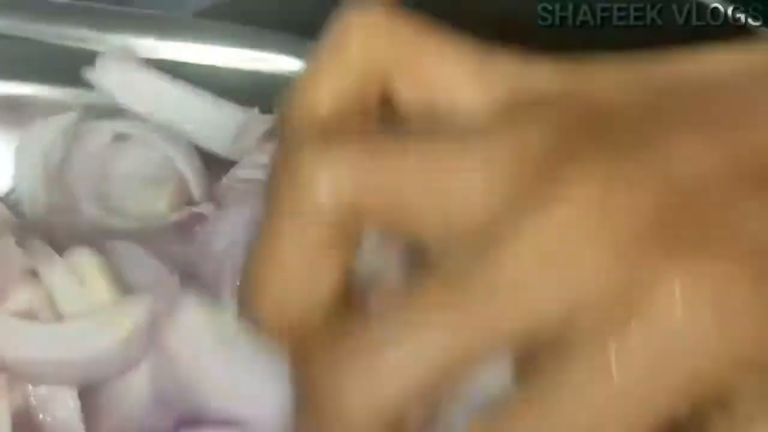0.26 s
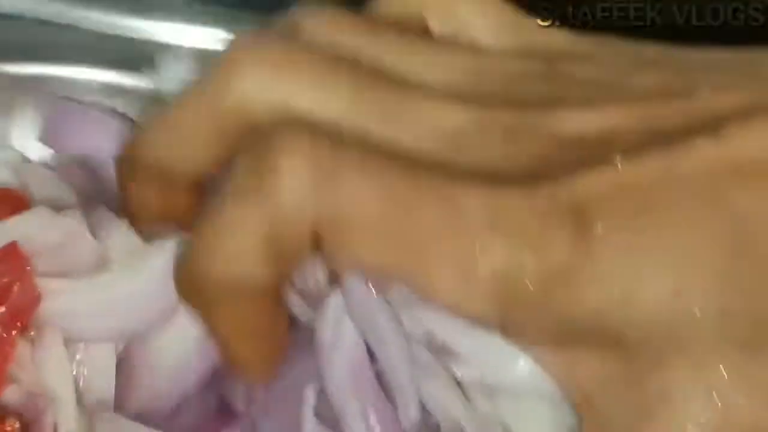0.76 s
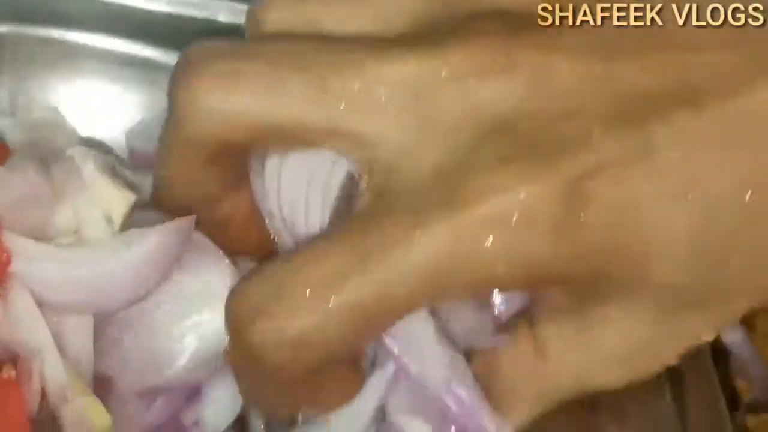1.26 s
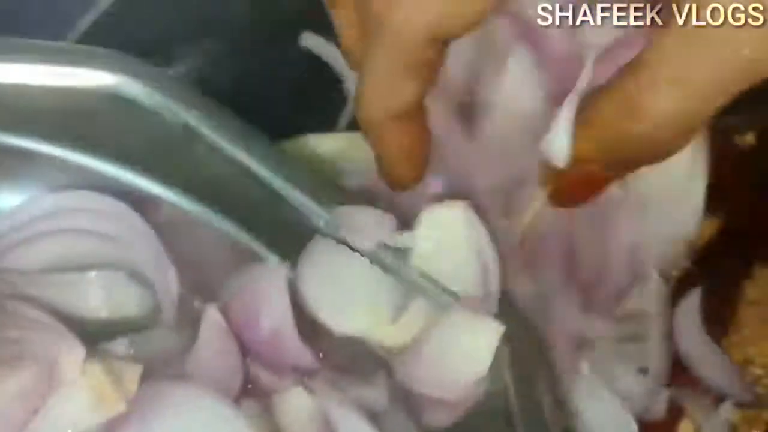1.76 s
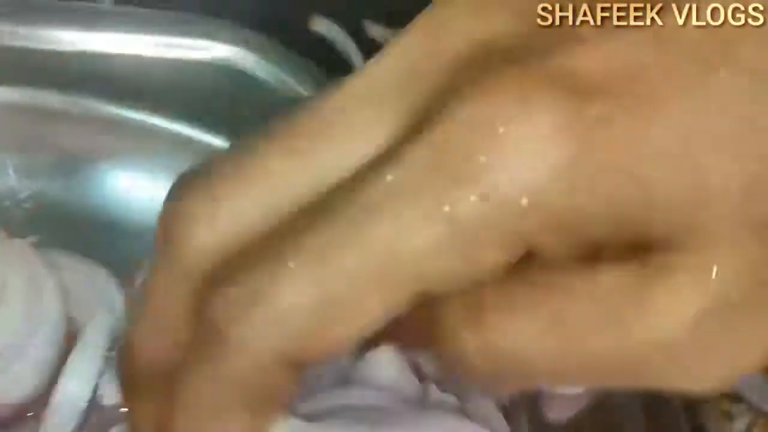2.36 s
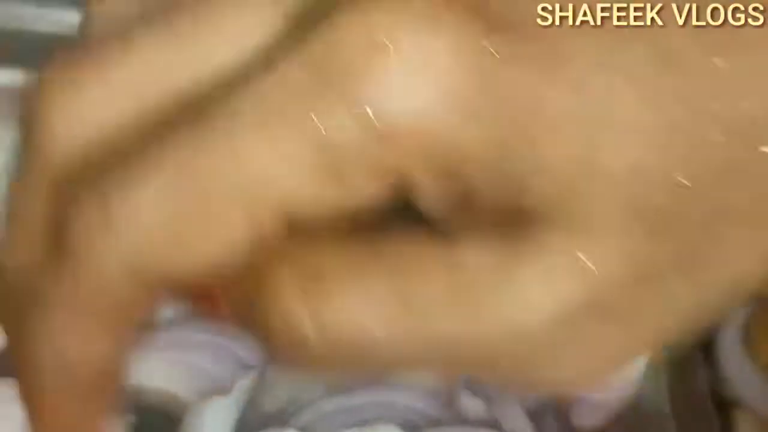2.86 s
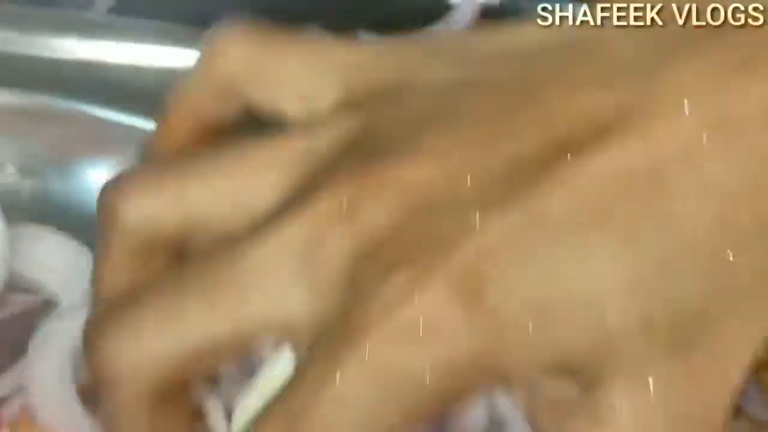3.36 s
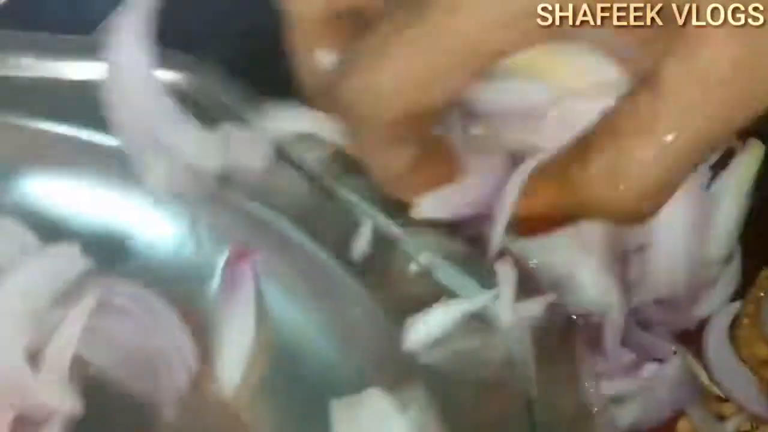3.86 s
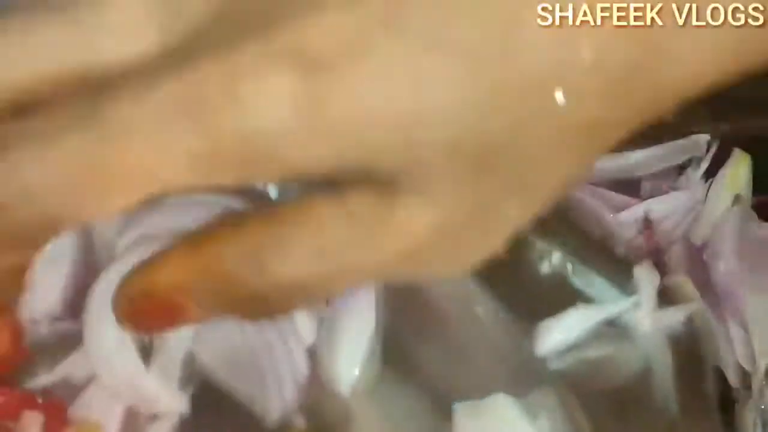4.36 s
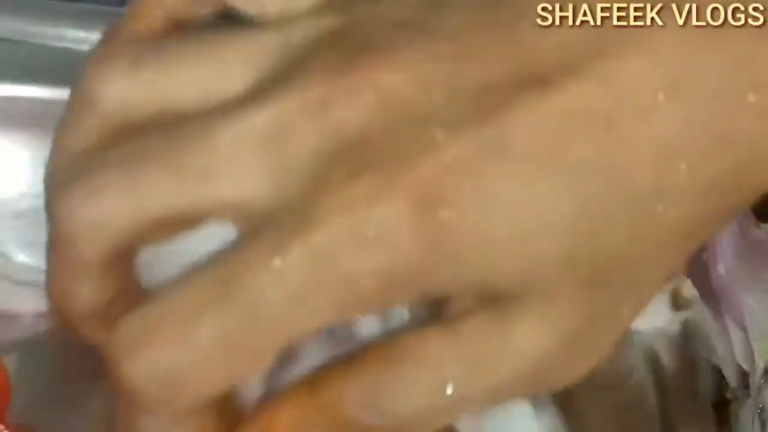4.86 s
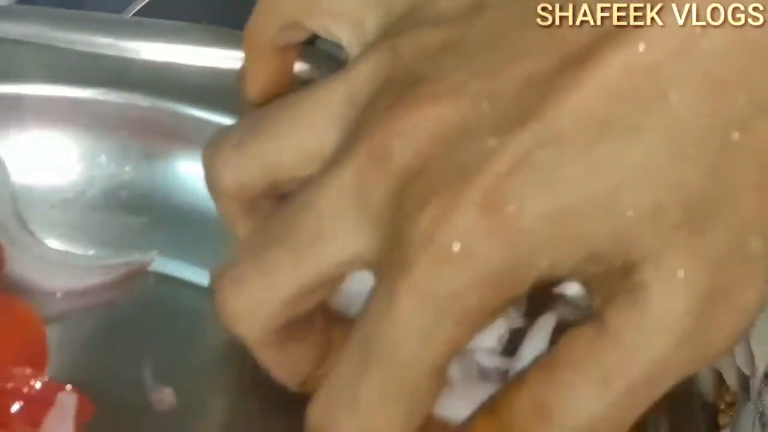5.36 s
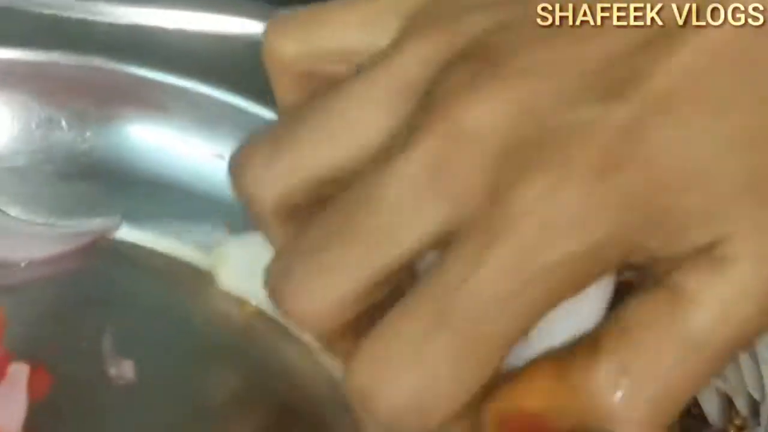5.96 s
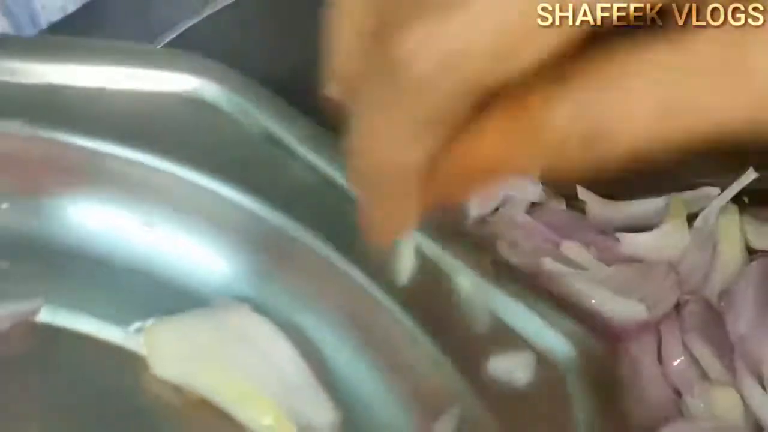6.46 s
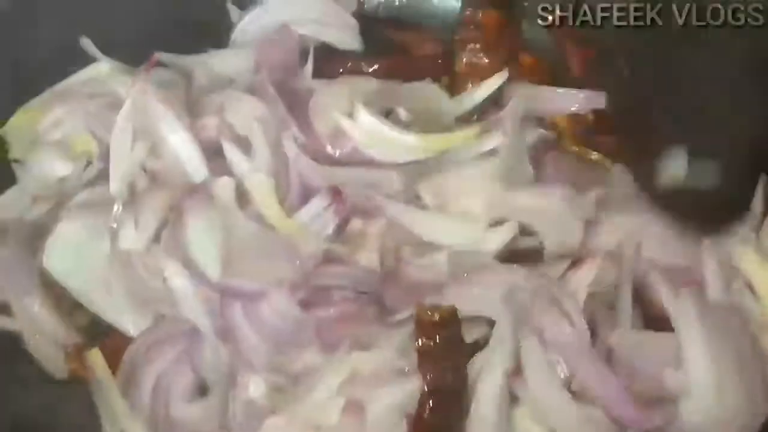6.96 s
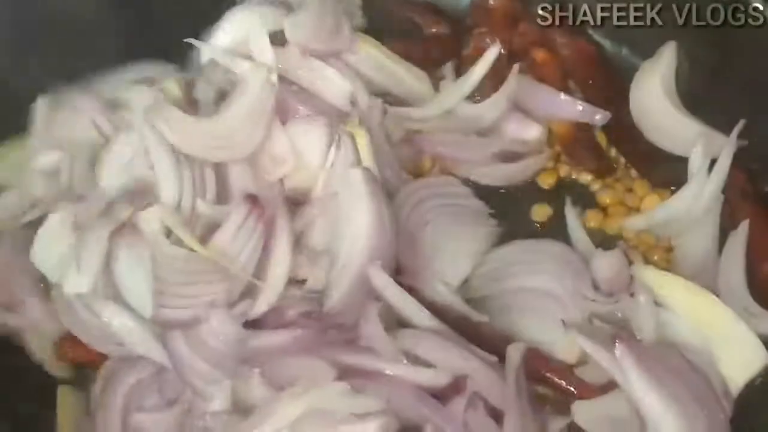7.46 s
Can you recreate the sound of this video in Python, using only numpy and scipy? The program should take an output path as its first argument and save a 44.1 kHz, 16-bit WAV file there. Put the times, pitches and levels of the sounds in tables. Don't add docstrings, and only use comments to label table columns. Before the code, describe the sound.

Close, lively pan sizzle of wet onions in oil, crackling and popping irregularly, turning nearer and hissier near the end with one hard tick.

```python
import sys
import numpy as np
from scipy import signal
from scipy.fft import rfft, irfft, next_fast_len
from scipy.io import wavfile
from scipy.ndimage import uniform_filter1d

SR = 44100
rng = np.random.default_rng(int(sys.argv[2]) if len(sys.argv) > 2 else 0)


def invert_db(level):
    return 10 ** (np.asarray(level, dtype=float) / 20)


def persist_wave(psi):
    counts = np.round(np.clip(psi, -1, 1) * 32767).astype(np.int16)
    wavfile.write(sys.argv[1], SR, np.atleast_2d(counts).T)


N = 339481
NEARER_S = 6.778


def in_time(rows):
    s, *columns = np.transpose(rows)
    return np.array([np.interp(np.arange(N) / SR, s, column) for column in columns])


def at_hz(points, hz):
    point_hz, value = np.array(points).T
    return np.interp(np.log(hz), np.log(point_hz), value)


def after(s, edge_s):
    return np.clip((np.arange(N) / SR - s) / edge_s, 0, 1)


def drift(rate):
    r = np.exp(-80 * np.pi * rate / SR)
    noise = rng.standard_normal(N // 40 + 2002)
    slow = signal.lfilter([1], [1, -2 * r, r * r], noise)[2000:]
    return np.interp(np.arange(N) / 40, np.arange(len(slow)), slow / slow.std())


def clicks(per_s, spread_db):
    return (rng.random(N) < per_s / SR) * invert_db(spread_db * np.minimum(rng.exponential(1, N), 4))


def dying(x, t60):
    return signal.lfilter([1], [1, -invert_db(-60 / (t60 * SR))], x + 1e-18)


def highpass(x, hz):
    return signal.sosfilt(signal.butter(2, hz, "high", fs=SR, output="sos"), x)


def resonate(x, modes):
    out = x.copy()
    for hz, width_hz, gain_db in modes:
        r = np.exp(-np.pi * width_hz / SR)
        poles = [1, -2 * r * np.cos(2 * np.pi * hz / SR), r * r]
        out += invert_db(gain_db) * signal.lfilter([(1 - r * r) / 2, 0, (r * r - 1) / 2], poles, x)
    return out


# frequency in Hz, left-right likeness from 0 to 1.
LIKENESS = [(60, 1), (130, 0.9), (290, 0.63), (640, 0.87), (1100, 0.34), (1900, 0.2), (3100, 0.075),
            (6820, 0.037), (15000, 0.11)]
# frequency in Hz, left minus right in dB.
LEAN = [(60, 0), (110, -0.5), (200, 3), (380, 1), (700, -4), (1290, -0.5), (2380, 3), (4400, 4),
        (8120, -3.5), (15000, 5.5)]
# frequency in Hz, lead of the left in radians.
LEAD = [(100, 0.24), (780, -0.5), (1460, 0.24), (1900, 1.5), (3100, -1.55), (5080, -9), (7490, -22),
        (15600, -40.5)]


def coloured(pair, spectrum):
    size = next_fast_len(N)
    hz = np.maximum(np.arange(size // 2 + 1) * SR / size, 1)
    mid, side = rfft(pair, size)
    alike = np.clip(at_hz(LIKENESS, hz), -.99, .99)
    ears = np.sqrt(1 + alike) * mid + np.sqrt(1 - alike) * side * [[1], [-1]]
    ears[0] *= np.exp(1j * at_hz(LEAD, hz))
    return hz, size, ears * invert_db(at_hz(spectrum, hz) + at_hz(LEAN, hz) * [[.5], [-.5]])


PAN_HZ = (264, 328, 571, 637, 680, 808, 900, 1161, 1317, 1678, 1952, 2370, 2832, 15450)
# width in Hz, gain over the fizz in dB.
PAN_RINGS = [(8, -14), (25, -2.5), (30, 1), (20, -6), (22, 3.5), (18, 5), (35, 0), (60, -22), (24.6, 1.5),
             (19.9, -5.5), (55, 0.5), (140, -12), (30, -3.5), (420, 4)]
# frequency in Hz, width in Hz, share cancelled.
REFLECTION_DIP = (768, 45, .85)


def bursting():
    rush = dying(clicks(per_s=99.0, spread_db=-1.5), t60=0.042)
    rush += 0.58 * dying(clicks(per_s=480.0, spread_db=2.0), t60=0.0074)
    fizz = rng.standard_normal((2, N)) * np.sqrt(1 + 0.22 * (rush / rush.mean()) ** 2)
    crackle = dying(clicks(per_s=400.0, spread_db=3.0), t60=0.0013) * rng.standard_normal((2, N))
    modes = [(hz, *ring) for hz, ring in zip(PAN_HZ, PAN_RINGS)]
    ringing = resonate(fizz + invert_db(-1.0) * crackle, modes)
    dip_hz, width_hz, share = REFLECTION_DIP
    return ringing - share * (resonate(ringing, [(dip_hz, width_hz, 0)]) - ringing)


# frequency in Hz, level in dB per Hz.
SIZZLE = [(88, -55), (150, -47), (326, -16.5), (428, -18.5), (681, -12.5), (766, -12.5), (1020, -11.5),
          (1340, -7.5), (1600, -5.5), (1980, -3), (3620, -4.5), (4930, -10.5), (7270, -2.5), (9920, -7.5),
          (15500, -12)]
# time in
# seconds, vigour in dB, wetness in dB.
HEAT = [(0, -19, -3.5), (.3, -19.5, -3), (.45, -20.5, -4), (.75, -20.5, -5), (.95, -23, -3.5),
        (1.5, -22, -3), (1.9, -24, -4), (2.5, -22, -2.5), (3.0, -23.5, 0), (3.85, -24.5, 0.5),
        (4.8, -23.5, 1.5), (5.55, -22, 0), (6.2, -23, -0.5), (6.77, -25, 2), (7.15, -23, 1),
        (7.45, -21.5, 2), (7.6, -25.5, 2.5), (7.7, -23, 5)]
FRY_HZ = (700, 2700, 4800, 8000)
WET_SHARE = (1, 0.73, 0.22, 0.038)
# frequency in Hz, change in dB.
NEAR_LEFT = [(500, -1.5), (2000, -1.5), (4800, 0.5), (6500, 3.5), (8000, 3), (14000, 1)]
# frequency in Hz, change in dB.
NEAR_RIGHT = [(500, -8.5), (2000, -6.5), (4800, 4), (6500, -9), (8000, 4), (14000, -6.5)]


def sizzle(own_db, near_db, slow_db):
    hz, size, ears = coloured(bursting(), SIZZLE)
    vigour_db, wet_db = in_time(HEAT)
    close = after(NEARER_S, .004)
    power = (np.abs(ears.mean(axis=0)) ** 2).sum() * 2 / size / N
    lift_db = vigour_db + 3.5 * close - 10 * np.log10(power)
    out, before = np.zeros((2, N)), drift(9)
    for octave in np.arange(7, 14.5, .5):
        patch = irfft(ears * np.maximum(0, 1 - 2 * np.abs(np.log2(hz) - octave)), size)[:, :N]
        share = at_hz(list(zip(FRY_HZ, WET_SHARE)), 2 ** octave)
        colour_db = np.outer([at_hz(side, 2 ** octave) for side in (NEAR_LEFT, NEAR_RIGHT)], close)
        beside = drift(9.7)
        flicker_db = own_db * drift(47) + near_db * (before + beside) + slow_db * drift(4.7)
        out += patch * invert_db(lift_db + share * wet_db + colour_db + flicker_db)
        before = beside
    return out


# start in seconds, peak in dB, cavity pitch in Hz, cavity level in dB.
SPITS = [(.248, -2, 2500, -2), (.716, -5.5, 1980, -14), (1.29, -8, 1420, -7), (1.362, -9.5, 2340, -1),
         (2.517, -8, 2020, -8), (2.926, -3, 2130, -2), (3.231, -7, 2380, -12), (3.273, -8.5, 1710, 6),
         (3.515, -18, 1500, 13), (3.94, -6, 2370, -13.5), (4.079, -6.5, 2380, -7), (4.106, -7.5, 2310, -6),
         (4.182, -6.5, 2000, -7), (4.305, -13, 1830, 3), (4.456, -8.5, 1680, -2), (4.575, -5, 2100, -13),
         (4.671, -7.5, 1310, -23), (4.777, -2, 2070, -5), (4.909, -6, 2300, 3), (5.069, -11.5, 2010, -20),
         (5.505, -6.5, 1510, -15), (5.772, -3, 2200, -1), (5.86, -8, 1320, -7), (6.09, -6, 1960, -3),
         (6.515, -9, 1680, -4), (6.805, -8, 2600, 1), (6.999, -5.5, 2460, -19), (7.363, -18, 1920, 0),
         (7.621, -12, 1710, -12), (7.659, -11, 2070, -6)]
# start in seconds, peak in dB.
SPATTER = [(0.186, -12), (.394, -17), (.481, -15), (0.632, -7.5), (0.816, -8.5), (1.033, -11), (1.09, -7.5),
           (1.204, -8), (1.24, -10), (1.491, -10), (1.992, -10), (2.211, -10.5), (2.574, -9.5),
           (.933, -10.5), (2.736, -9), (3.07, -11.5), (3.168, -7.5), (4.245, -8.5), (5.167, -7),
           (5.231, -6.5), (5.359, -21), (5.684, -8.5), (6.011, -12), (6.347, -9.5), (6.388, -10.5),
           (6.428, -9.5), (6.598, -9), (6.726, -11), (6.782, -9), (7.591, -11)]
# lowest in Hz, highest in Hz.
SPATTER_HZ = (1500, 2480)


def spits():
    spray_t60_s, hollow_db, rise_s = 0.15, -5.5, 0.00048
    crack_low_db, crack_top_hz, snap_db = -18, 9900, 6
    t = np.arange(4096) / SR
    hz = np.maximum(np.arange(2049) * SR / 4096, 1)
    colour = invert_db(at_hz(SIZZLE, hz)) + invert_db(crack_low_db) * (hz < 1500) * (hz > 600)
    body = invert_db(at_hz(SIZZLE, hz))
    colour = colour / np.sqrt(1 + (hz / crack_top_hz) ** 2)
    colour = colour / np.sqrt(np.mean(colour ** 2))
    out = np.zeros((2, N + len(t)))
    small = [(s, db, rng.uniform(*SPATTER_HZ), hollow_db) for s, db in SPATTER]
    for s, peak_db, cavity_hz, cavity_db in list(SPITS) + small:
        t60 = max(spray_t60_s * invert_db(hollow_db - cavity_db), .005)
        fall = invert_db(-60 * t / t60 - 12.5) + invert_db(-60 * t / 0.012 - 7.5)
        spray = rng.standard_normal((2, len(t))) * fall * (1 - np.exp(-t / rise_s))
        spray += 0.19 * spray.sum(axis=0)
        spray[:, 40] += invert_db(snap_db - 10) * rng.choice([-1, 1])
        spray = irfft(rfft(np.roll(spray, 64, axis=1)) * colour)
        ring = invert_db(cavity_db - 60 * t * cavity_hz / 7.5) * np.sin(2 * np.pi * cavity_hz * t * (1 + 25 * t))
        ring = ring + 0.6 * np.roll(ring, round(0.0034 * SR))
        at = round(s * SR) - 48
        out[:, at:at + len(t)] += invert_db(peak_db - 2.5) * (spray + np.roll(ring, 90))
    return highpass(out[:, :N], 400)


# start in seconds, peak in dB, low over high in dB.
TICKS = [(0.077, -3, -8.0), (0.301, -9, 2), (0.369, -4, -8.0), (0.528, -8.0, -12.0), (0.734, -9.0, -9),
         (1.455, -9, 6), (1.786, -14, -8), (1.924, -20, -5), (1.934, -10.5, 3), (2.079, -15, -8.0),
         (2.12, -6.5, 5), (2.277, -8.5, 3), (2.495, -18, -13.0), (2.534, -5, -11), (2.686, -8, -2),
         (2.933, -10.0, -11), (3.246, -7, -13), (3.349, -18, -6.0), (3.38, -23, -1.0), (3.433, -10.5, 10),
         (3.476, -10, 6), (3.679, -9, -19), (3.74, -6, 9), (3.77, -13.0, 2), (4.168, -7, -6.0),
         (4.335, -12, 5.0), (4.367, -20, 4.0), (4.478, -11, 12), (4.529, -14.0, -5), (4.583, -4, -11),
         (4.656, -8, -1), (4.837, -11.0, -4), (4.873, -15, -10.0), (4.921, -9.0, -3), (5.015, -13.0, -8),
         (5.21, -2, -3.0), (5.427, -5, -6), (5.543, -3, 4), (5.7, -5, -11), (5.731, -18, 4),
         (5.778, -16, -6), (5.819, -11.0, -14), (6.066, -8, -10.0), (6.196, -14, -1.0), (6.499, -8, -14),
         (6.521, -6.5, -15), (6.604, -12.0, 1.0), (6.68, -13.0, 2.0), (6.787, -7, -6), (6.819, -9.0, -9),
         (6.833, -15, -12), (6.845, -19, -12), (6.868, -21, -12.0), (6.883, -20, -5), (6.914, -11, -14),
         (7.257, -7.0, -4), (7.313, -17, -12.0), (7.334, -8.0, -3), (7.425, -2, -11), (7.486, -12, -9)]


def ticks():
    rise_s, t60_s, tail_s, tail_db, split_hz = 0.00041, 0.0053, 0.041, -14.5, 4500
    hz, size, ears = coloured(rng.standard_normal((2, N)), SIZZLE)
    out, t = np.zeros((2, N)), np.arange(2048) / SR
    shape = (1 - np.exp(-t / rise_s)) * (invert_db(-60 * t / t60_s) + invert_db(tail_db - 60 * t / tail_s))
    for side in (1, -1):
        part = irfft(ears * (side * (split_hz - hz) > 0), size)[:, :N]
        strikes = np.zeros(N)
        for s, peak_db, tilt_db in TICKS:
            strikes[round(s * SR)] = invert_db(peak_db - 4.5 + side * (tilt_db + 1.5) / 2)
        out += part / part.std() * signal.oaconvolve(strikes, shape)[:N]
    return highpass(out, 450)


# start in seconds, peak in dB.
SNAPS = [(0.06, -10), (0.1085, -14.0), (0.1888, -13), (0.3581, -11), (0.4198, -15.0), (0.5972, -14.0),
         (0.6543, -13.0), (1.4346, -16.0), (1.6221, -16.0), (1.709, -17.0), (1.7304, -18.0), (1.9637, -11),
         (1.994, -15), (2.0805, -16.0), (2.521, -11.0), (2.5266, -16), (2.5342, -12.0), (2.607, -14.0),
         (2.819, -16.0), (2.8296, -21), (2.927, -14), (3.0728, -15.0), (3.1918, -15.0), (3.2718, -12),
         (3.3252, -15.0), (3.352, -16.0), (3.407, -17.0), (3.5615, -14), (3.6172, -17.0), (3.914, -16.0),
         (3.9405, -12.0), (4.062, -14), (4.1166, -14.0), (4.1315, -15), (4.4602, -13.0), (4.4669, -16.0),
         (4.5362, -13), (5.11, -15.0), (5.2512, -15.0), (5.3609, -14.0), (5.8639, -13.0), (6.1105, -16.0),
         (6.1712, -15.0), (6.1972, -13.0), (6.361, -13.0), (6.5386, -16), (6.6003, -16), (6.622, -16),
         (6.6304, -16.0), (6.8134, -13.0), (6.9297, -13.0), (6.9457, -6), (7.003, -10.0), (7.0182, -6),
         (7.2195, -8), (7.2586, -11.0), (7.4262, -10), (7.4433, -11.0), (7.501, -11), (7.5926, -14.0)]
# pitch in Hz, t60 in seconds, level in dB.
SNAP_RINGS = [(2410, 0.0043, -4), (7500, 0.003, -2.5)]


def snaps():
    t, out = np.arange(512) / SR, np.zeros((2, N + 512))
    for (s, peak_db), chance in zip(SNAPS, rng.uniform(-1, 1, (len(SNAPS), 6))):
        at = round(s * SR) - 6
        for (hz, t60, ring_db), (tune, lean, turn) in zip(SNAP_RINGS, chance.reshape(2, 3)):
            phase = 2 * np.pi * hz * (1 + 0.25 * tune) * t + np.outer([0, 1.5], turn)
            level_db = peak_db + ring_db - 60 * t / t60 + np.outer([3, -3], lean)
            out[:, at:at + len(t)] += invert_db(level_db) * np.sin(phase)
    return out[:, :N]


# start in seconds, peak in dB, pitch in Hz.
POPS = [(0.227, -11, 1300), (0.247, -6, 1420), (1.288, -21, 1420), (1.49, -15, 1330), (2.119, -12, 1410),
        (2.322, -12, 1300), (2.737, -26, 910), (2.879, -19, 675), (2.965, -21, 1150), (3.384, -13, 1430),
        (3.517, -4, 1410), (3.879, -14.5, 1410), (3.939, -21, 1480), (3.974, -8, 1400), (4.245, -13, 859),
        (4.409, -23, 1390), (4.777, -19, 1310), (5.427, -13, 1310), (5.488, -13, 1240), (5.73, -13.5, 915),
        (5.769, -9, 1140), (6.09, -25, 1530), (6.241, -29, 216), (6.372, -11.5, 1060), (6.426, -11, 960),
        (6.492, -11, 1400), (6.727, -2.5, 1550), (7.017, -18, 1350), (7.334, -12, 870), (7.397, -6, 1400),
        (6.278, -17, 750), (6.388, -16, 700), (5.898, -9, 1750), (0.087, -19, 790), (0.197, -19, 900),
        (0.514, -23, 680), (1.088, -23, 700), (1.516, -13, 1220), (1.786, -22, 930), (2.925, -21, 810),
        (3.01, -17, 890), (3.23, -23, 820), (3.272, -16, 930), (3.407, -15, 920), (4.475, -17, 860),
        (4.555, -13, 1290), (4.575, -16, 1300), (4.616, -20, 805), (4.655, -16, 1150), (4.966, -15, 1100),
        (5.509, -15, 1150), (5.636, -8, 1270), (5.82, -19, 1000), (5.935, -11.5, 1060), (6.195, -18, 816),
        (6.265, -17, 805), (6.336, -20, 810), (6.515, -20, 680), (7.451, -18, 670), (7.68, -17, 930)]


def pops():
    rise_s, late_s, overtone, overtone_db = 0.00047, 0.0017, 1.395, -5.5
    t, out = np.arange(1024) / SR, np.zeros(N + 1024)
    rise = 1 - np.exp(-t / rise_s)
    for s, peak_db, hz in POPS:
        at = round((s + late_s) * SR)
        knock = invert_db(peak_db - 1.5 - 60 * t * hz / 12.0) * np.sin(2 * np.pi * hz * t * (1 + 40 * t))
        over = invert_db(peak_db + 2.5 + overtone_db - 60 * t * hz / 10.0) * np.sin(2 * np.pi * overtone * hz * t)
        out[at:at + len(t)] += rise * (knock + over)
    return highpass(out[:N], 300)


def blips():
    bubbles = clicks(per_s=70., spread_db=5.0) * rng.choice([-1, 1], N)
    dealt = rng.integers(0, 12, N)
    out = np.zeros(N)
    for k, hz in enumerate(np.geomspace(380, 1700, 12)):
        r, w = invert_db(-60 * hz / 3.6 / SR), 2 * np.pi * hz / SR
        struck = bubbles * (dealt == k) + 1e-18
        out += signal.lfilter([0, np.sin(w)], [1, -2 * r * np.cos(w), r * r], struck) * hz / 1000
    return invert_db(-35.5) * highpass(out, 250)


# start in seconds, peak in dB, push in seconds, rebound in seconds.
DROPLET = (7.5011, .5, .00085, .0018)


def droplet():
    s, peak_db, push_s, rebound_s = DROPLET
    t = np.arange(N) / SR - s
    push = np.sin(np.pi * np.clip(t / push_s, 0, 1))
    rebound = np.sin(np.pi * np.clip((t - push_s) / rebound_s, 0, 1)) * push_s / rebound_s
    since = np.maximum(t + 0.0004, 0)
    tick = .55 * np.sin(2 * np.pi * 8500 * since) * np.exp(-since / 0.001)
    return invert_db(peak_db) * ((push - .9 * rebound) * [[0], [1]] + tick)


# frequency in Hz, width in Hz, gain in dB.
PAN_DRONE = [(288.5, 12, 18.5)]
# time in seconds, pitch in Hz, level in dB.
STOVE_DRONE = [
    (6.8, 96, -62),
    (7.04, 96, -55),
    (7.13, 115, -56),
    (7.22, 116, -55),
    (7.33, 90, -59),
    (7.6, 92, -66),
]


def hum():
    pan, flutter = resonate(rng.standard_normal(N), PAN_DRONE), rng.standard_normal(N)
    pan = pan / pan.std() * invert_db(-41.5) * (1 - after(2.17, .17))
    hz, level_db = in_time(STOVE_DRONE)
    flutter = uniform_filter1d(uniform_filter1d(flutter, size=1500), size=1500)
    level_db = level_db + 2.5 * flutter / flutter.std()
    moan = np.sqrt(2) * np.sin(2 * np.pi * np.cumsum(hz) / SR) * invert_db(level_db)
    return pan + moan * after(NEARER_S, .02)


# frequency in Hz, level in dB per Hz.
STOVE = [(15, -48), (25, -4), (65, -13), (102, -3), (172, -15), (193, -8.5), (221, -7), (250, 3.5),
         (320, -29), (550, -120)]


def stove():
    far_db, near_db = -57.5, -54
    hz, size, ears = coloured(rng.standard_normal((2, N)), STOVE)
    rumble = irfft(ears, size)[:, :N] * invert_db(1.6 * drift(4.9))
    level_db = far_db + (near_db - far_db) * after(NEARER_S, .02)
    return rumble / rumble.mean(axis=0).std() * invert_db(level_db)


def kitchen(x):
    level_db, t60_s = -11, 0.16
    t = np.arange(8192) / SR
    tail = rng.standard_normal((2, len(t))) * invert_db(-60 * t / t60_s) * (t > .002)
    tail = highpass(tail, 400)
    tail *= invert_db(level_db) / np.sqrt((tail ** 2).sum(axis=1, keepdims=True))
    return x + signal.oaconvolve(x, tail, axes=1)[:, :N]


# start in seconds, length in seconds, centre in Hz.
GAPS = [(0.0, 0.041, 4280), (0.0, 0.11, 4590), (0.017, 0.11, 4930), (0.11, 0.11, 5020),
        (0.122, 0.029, 4800), (0.366, 0.11, 4890), (0.383, 0.041, 4540), (0.522, 0.041, 5020),
        (0.911, 0.081, 4500), (0.987, 0.029, 3850), (1.08, 0.017, 5360), (1.086, 0.029, 4930),
        (1.097, 0.017, 4460), (1.202, 0.029, 4410), (1.364, 0.041, 4370), (1.387, 0.029, 5450),
        (1.434, 0.041, 5150), (1.544, 0.081, 4630), (1.55, 0.11, 4970), (1.666, 0.11, 4590),
        (1.678, 0.11, 4930), (1.689, 0.081, 5060), (1.747, 0.029, 5840), (1.776, 0.041, 5450),
        (1.823, 0.081, 4500), (1.869, 0.058, 4930), (1.991, 0.11, 4630), (1.997, 0.041, 4970),
        (2.072, 0.041, 4460), (2.154, 0.029, 4930), (2.293, 0.058, 4410), (2.403, 0.081, 4930),
        (2.426, 0.058, 5400), (2.56, 0.081, 4840), (2.618, 0.017, 5150), (2.757, 0.058, 5060),
        (2.937, 0.029, 5020), (2.943, 0.058, 4590), (3.013, 0.029, 4970), (3.286, 0.041, 5150),
        (3.506, 0.058, 4840), (3.535, 0.017, 4500), (3.657, 0.029, 4890), (3.988, 0.029, 5490),
        (4.331, 0.041, 4460), (4.847, 0.029, 4500), (5.103, 0.041, 4840), (5.236, 0.058, 5020),
        (5.515, 0.029, 4410), (5.863, 0.058, 4500), (5.869, 0.029, 5400), (5.985, 0.029, 4670),
        (6.809, 0.081, 4840), (6.925, 0.058, 4500), (6.96, 0.017, 4840), (7.024, 0.029, 4370),
        (7.221, 0.041, 4460), (7.378, 0.017, 4890), (7.465, 0.029, 5020), (7.68, 0.012, 4930)]
# start in seconds, length in seconds, centre in Hz.
TOP_GAPS = [(0.47, 0.041, 12900), (0.615, 0.029, 12640), (0.714, 0.029, 12640), (1.19, 0.029, 12510),
            (1.219, 0.029, 13070), (1.219, 0.029, 13290), (1.219, 0.058, 13630), (2.078, 0.029, 13590),
            (2.078, 0.041, 13370), (2.554, 0.058, 12900), (2.554, 0.081, 12640), (2.723, 0.017, 13630),
            (2.821, 0.041, 13590), (2.897, 0.041, 12900), (2.914, 0.029, 12550), (2.937, 0.017, 13500),
            (3.222, 0.029, 14320), (3.338, 0.029, 14190), (3.431, 0.029, 13330), (3.431, 0.029, 13670),
            (3.535, 0.017, 14060), (3.593, 0.029, 13720), (3.599, 0.041, 13370), (3.866, 0.017, 12170),
            (3.93, 0.041, 13330), (3.936, 0.029, 13590), (4.093, 0.11, 12940), (4.098, 0.029, 12680),
            (4.122, 0.081, 14230), (4.18, 0.017, 12550), (4.696, 0.041, 10960), (4.766, 0.041, 14190),
            (4.778, 0.029, 13330), (4.87, 0.029, 13240), (5.172, 0.029, 13330), (5.323, 0.041, 13370),
            (5.329, 0.029, 13720), (5.544, 0.017, 12300), (5.654, 0.058, 13850), (5.7, 0.041, 13330),
            (5.915, 0.029, 13540), (5.997, 0.017, 13330), (6.002, 0.017, 12040), (6.258, 0.058, 13540),
            (6.264, 0.11, 13240), (6.351, 0.012, 12080), (6.49, 0.058, 13590), (6.577, 0.029, 12680),
            (6.716, 0.041, 13070), (6.728, 0.029, 12640), (6.861, 0.012, 13500), (7.465, 0.029, 10360)]
# lowest centre in Hz, highest centre in Hz, count.
FLECKS = [(4200, 5400, 60), (9500, 12000, 60), (12000, 15500, 170)]


def dropouts(x):
    gap_width_hz, fleck_width_hz, fleck_s = 470, 240, .035
    out, t = x.copy(), np.arange(N) / SR
    holes = [(*gap, gap_width_hz) for gap in list(GAPS) + list(TOP_GAPS)]
    for low_hz, high_hz, count in FLECKS:
        for s, long, up, wide in rng.random((count, 4)):
            centre_hz = low_hz + (high_hz - low_hz) * up
            holes.append((s * N / SR, fleck_s * long, centre_hz, fleck_width_hz * (.5 + wide)))
    for s, length, centre_hz, width_hz in holes:
        near = slice(max(0, round((s - .03) * SR)), round((s + length + .03) * SR))
        count = len(t[near])
        hz = np.arange(count // 2 + 1) * SR / count
        band = irfft(rfft(out[:, near]) * (np.abs(hz - centre_hz) < width_hz / 2), count)
        out[:, near] -= band * np.interp(t[near] - s, [-.012, -.006, length + .004, length + .01], [0, 1, 1, 0])
    return out


def scene():
    frying = sizzle(own_db=1.0, near_db=0.75, slow_db=-0.2) + spits() + ticks() + snaps() + pops() + blips()
    frying = frying + hum() + stove()
    ducked = after(7.494, .0029) - after(7.59, .0029)
    duck_db = np.outer((-2.5, -8.5), ducked)
    offset_db = 0.27 * np.array([[.5], [-.5]])
    return kitchen(frying) * invert_db(duck_db + offset_db) + droplet()


def band_limit(x):
    return signal.sosfilt(signal.butter(12, 16400, fs=SR, output="sos"), x)


def record(dry):
    top_cut = signal.ellip(12, .5, 75, 15480, fs=SR, output="sos")
    heard = highpass(signal.sosfilt(top_cut, np.tanh(dry)), 60)
    return band_limit(dropouts(heard))


dry = scene()
out = record(dry)
persist_wave(out)
```